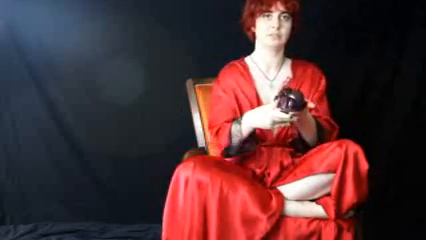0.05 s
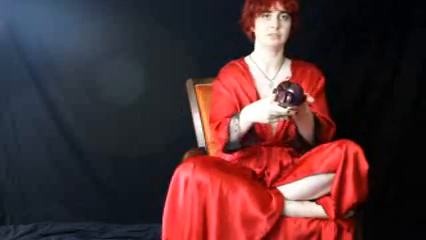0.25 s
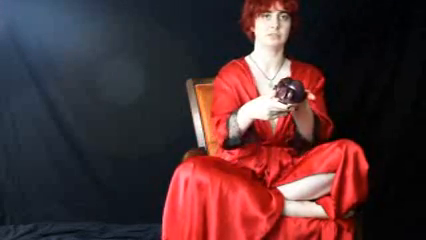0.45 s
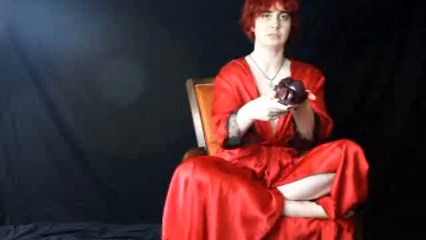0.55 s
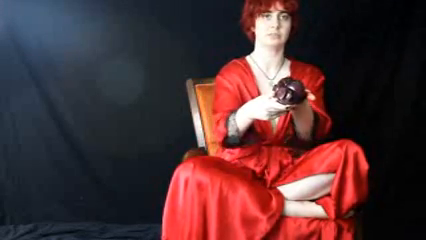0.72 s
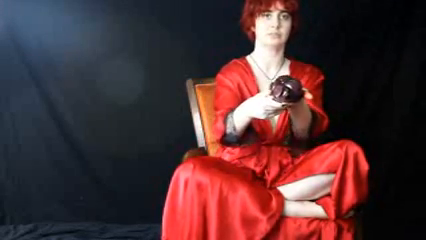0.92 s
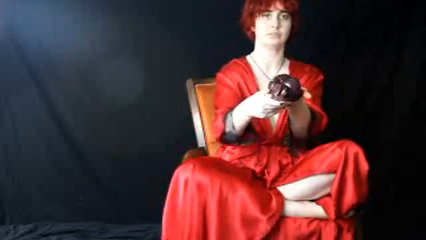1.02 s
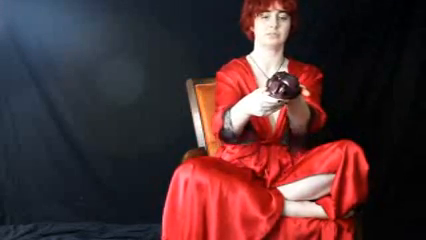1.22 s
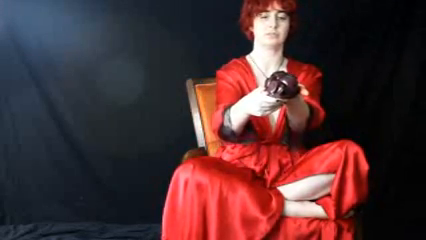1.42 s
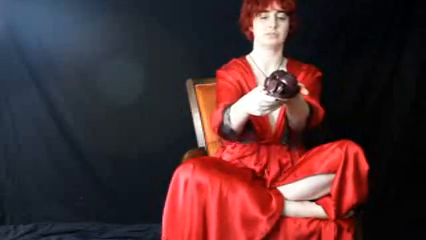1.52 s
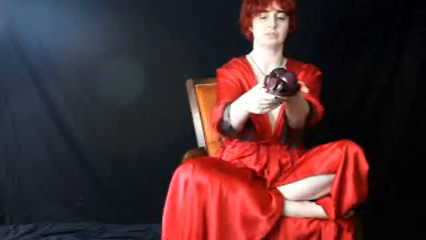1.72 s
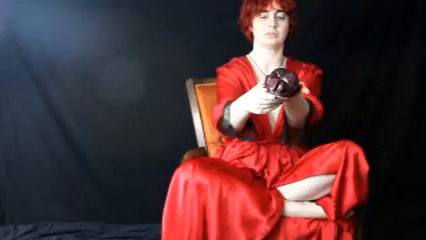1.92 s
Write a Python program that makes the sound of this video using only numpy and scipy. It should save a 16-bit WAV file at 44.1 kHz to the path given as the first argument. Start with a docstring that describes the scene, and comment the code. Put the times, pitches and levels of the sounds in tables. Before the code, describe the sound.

A camera shutter fires a burst of four shots in a quiet room, a little way from the microphone. A light button tap comes just before the shots, which start at about 0.2, 0.45, 0.7 and 0.95 seconds. Each is a crisp mechanical double-clack with a slight metallic ring, brief gear rattle and short room echo. From about 1.2 seconds only a faint hiss remains.

```python
"""In a quiet room, a little way from the microphone, a reflex camera fires a burst of four frames.
Each frame is the same chain of small blows: a lever trips, the mirror slaps up, two shutter curtains
snap across, the mirror drops and bounces, and the gears wind on. The blows make the camera's body
and springs ring, and the room answers. A faint hiss lies underneath."""
import sys
import numpy as np
from scipy import signal
from scipy.fft import rfft, irfft, next_fast_len
from scipy.io import wavfile

SR = 44100
rng = np.random.default_rng(int(sys.argv[2]) if len(sys.argv) > 2 else 0)


def bounce(signal):
    """Save signal as a 16-bit WAV file at the path given by the first command-line argument."""
    frames = np.transpose(np.atleast_2d(signal))
    limited = np.clip(frames, -1, 1)
    pcm = np.round(limited * 32767).astype(np.int16)
    wavfile.write(sys.argv[1], SR, pcm)


N = 85995
TIME = np.arange(N) / SR
BUTTON_S = 0.1556

# Each row is one frame: when the lever trips, the first curtain snaps and the mirror drops, in seconds.
FRAMES = [(0.2003, 0.2750, 0.3159), (0.4605, 0.5223, 0.5634), (0.7083, 0.7697, 0.8115),
          (0.9564, 1.0179, 1.0592)]


def mirror_fall():
    """The loudest clack: the mirror lands with a ping, bounces and leaves the springs singing."""
    # Each row is one landing: strength in dB, extra level of its ping in dB.
    landings = [(3, -1.5), (2.5, -7.5), (3, -1), (2, 1.5)]
    # Each row: time of a bounce in seconds, level in dB.
    bounces = [(0.3234, -4.5), (0.3303, -13), (0.5661, -7), (0.5709, -13), (0.5772, -10), (0.8196, -9.5),
               (0.8246, -15.5), (1.0673, -6.5), (1.073, -15)]
    # The tone of the clack. Each row: frequency in Hz, level in dB.
    colour = [(200, -18.5), (450, -4), (750, -2.5), (1900, -1), (2600, 3), (3700, 4), (4900, -5.5),
              (8000, -6), (10500, -21), (15000, -28)]
    # How mirror and springs ring. Each row: pitch in Hz, level in dB, seconds to fade by 60 dB.
    mirror_notes = [(2500, -25, 0.0076), (3320, -23.5, 0.006), (3460, -21, 0.01), (3890, -27, 0.013)]
    spring_notes = [(2760, -54, 0.27), (2923, -56, 0.27), (3397, -51.5, 0.21), (3483, -56, 0.17),
                    (4100, -55, 0.13)]
    drop_times = np.array(FRAMES)[:, 2]
    drop_db, ping_db = np.transpose(landings)
    bounce_times, bounce_db = np.transpose(bounces)
    out = contact(drop_times, drop_db, colour, mirror_notes,
                  settle_s=0.0005, snap_db=-18.5, fade_s=0.013, body_db=-19, ping_db=ping_db)
    out += contact(bounce_times, bounce_db, colour, mirror_notes,
                   settle_s=0.0005, snap_db=3, fade_s=0.013, body_db=-6, ping_db=-8)
    singing = ring(spring_notes, size=16000)
    for start, db in zip(drop_times, drop_db):
        add(out, start + 0.0005, from_db(db) * singing)
    return out


def mirror_rise():
    """The button taps once; in each frame a lever throws the mirror up past its damper to its stop."""
    # The tone of each click. Each row: frequency in Hz, level in dB.
    button_colour = [(450, -28), (900, -10), (1800, -11.5), (2800, -8), (4000, -17.5), (7500, -17.5),
                     (10500, -38), (15000, -43)]
    lever_colour = [(200, -20), (450, -16), (800, 4), (1300, 2), (2100, 1.5), (3600, -1.5), (5800, -3.5),
                    (8200, -8.5), (11000, -19), (15000, -23.5)]
    slap_colour = [(200, -48), (450, 0.5), (900, 4.5), (2600, -5.5), (3600, 3.5), (5000, -7), (8200, -20),
                   (15000, -30)]
    # How each part rings. Each row: pitch in Hz, level in dB, seconds to fade by 60 dB.
    button_notes = [(990, -40, 0.04), (1410, -43, 0.057)]
    lever_notes = [(1068, -35.5, 0.041), (1947, -33, 0.016), (2697, -34.5, 0.036)]
    stop_notes = [(3623, -30, 0.012)]
    trip_times = np.array(FRAMES)[:, 0]
    graze_after_s, slap_after_s = 0.0162, 0.0186
    tap = contact([BUTTON_S], 0, button_colour, button_notes,
                  settle_s=0.000399, snap_db=5, fade_s=0.012, body_db=-25.5)
    trip = contact(trip_times, 0, lever_colour, lever_notes,
                   settle_s=0.001, snap_db=-9.5, fade_s=0.02, body_db=-33)
    graze = contact(trip_times + graze_after_s, -4.5, lever_colour, lever_notes,
                    settle_s=0.0008, snap_db=3.5, fade_s=0.012, body_db=-4)
    slap = contact(trip_times + slap_after_s, 0, slap_colour, stop_notes,
                   settle_s=0.00011, snap_db=-2.5, fade_s=0.0092, body_db=-1.0)
    return tap + trip + graze + slap


def curtains():
    """The shutter opens and closes with two light snaps: the first crisp, the second fuller."""
    # The tone of each snap. Each row: frequency in Hz, level in dB.
    first_colour = [(200, -9.5), (450, -7.5), (850, 1), (1300, -1.5), (3500, -4.5), (5800, -4.5),
                    (8800, -3), (11000, -10.5), (15000, -19)]
    second_colour = [(200, 4), (450, -16.5), (850, 1.5), (1300, 2), (1900, 1.5), (3500, -2.5), (8500, -8.5),
                     (11000, -19), (15000, -28)]
    # How each curtain rings. Each row: pitch in Hz, level in dB, seconds to fade by 60 dB.
    first_notes = [(1750, -38, 0.017), (5700, -34, 0.012)]
    second_notes = [(930, -23, 0.013), (1830, -30, 0.0073), (2570, -34.5, 0.016)]
    open_times, exposure_s = np.array(FRAMES)[:, 1], 0.0162
    opening = contact(open_times, -0.64, first_colour, first_notes,
                      settle_s=0.00046, snap_db=-19, fade_s=0.014, body_db=-14.5)
    closing = contact(open_times + exposure_s, -0.55, second_colour, second_notes,
                      settle_s=0.0012, snap_db=-16.5, fade_s=0.017, body_db=-19)
    return opening + closing


def contact(times, levels_db, colour, notes, settle_s, snap_db, fade_s, body_db, ping_db=0):
    """A part hits its stop: it chatters, settles with one sharp snap, pings and knocks the body."""
    # How the camera's body rings. Each row: pitch in Hz, level in dB, seconds to fade by 60 dB.
    body_notes = [(435, -39.5, 0.033), (618, -41.5, 0.022), (830, -19, 0.039), (944, -32.5, 0.034),
                  (1450, -34, 0.064)]
    variation = 0.45   # how much one blow differs from the next
    usual = chatter(settle_s / 2, fade_s, size=1024)
    usual[int(settle_s * SR)] += from_db(snap_db)
    usual /= np.linalg.norm(usual)
    knock = from_db(body_db) * ring(body_notes, size=4096)
    ping = ring(notes, size=4096)
    out = np.zeros(N)
    for start, gain, ping_gain in zip(*np.broadcast_arrays(times, from_db(levels_db), from_db(ping_db))):
        fresh = chatter(settle_s / 2, fade_s, size=1024)
        crack = (usual + variation * fresh) / np.hypot(1, variation)
        add(out, start, gain * tint(crack, colour))
        add(out, start + settle_s, gain * (knock + ping_gain * ping))
    return out


def chatter(rise_s, fade_s, size):
    """A few milliseconds of dense rattling, about equally strong at all frequencies."""
    t = TIME[:size]
    burst = rng.standard_normal(size) * (1 - np.exp(-t / rise_s)) * from_db(-60 * t / fade_s)
    spectrum = rfft(burst, 2 * size)
    rattle = irfft(spectrum / np.abs(spectrum))[:size]
    return rattle / np.linalg.norm(rattle)


def ring(notes, size):
    """A struck part rings with fading pure tones; neighbouring tones swing opposite ways."""
    t = TIME[:size]
    return sum((-1) ** k * from_db(db - 60 * t / fade_s) * np.sin(2 * np.pi * hz * t)
               for k, (hz, db, fade_s) in enumerate(notes))


def gears():
    """The gears rattle briefly after each frame; the motor runs faintly all through the burst."""
    # The tone of the gears and of the motor. Each row: frequency in Hz, level in dB.
    gear_colour = [(200, -36), (450, -1.5), (900, 3.5), (1550, -2.5), (2100, -2.5), (3400, -0.5),
                   (5000, -7.5), (7800, -16), (10500, -19), (15000, -28)]
    motor_colour = [(200, -10), (400, 3), (560, -3.5), (900, -4), (2000, -13), (3500, -10.5), (7500, -23.5),
                    (10500, -34), (15000, -38)]
    wind_s, slow_down_s, wind_db, motor_db = 0.041, 0.011, -14, -24

    def running(start, end):
        return (TIME > start) * np.exp(-np.maximum(TIME - end, 0) / slow_down_s)

    load = sum(running(drop, drop + wind_s) for _, _, drop in FRAMES)
    winding = from_db(wind_db) * load * teeth(gear_colour)
    motor = from_db(motor_db) * running(BUTTON_S, FRAMES[-1][2]) * teeth(motor_colour)
    return winding + motor


def teeth(colour, teeth_per_s=700):
    """Gear teeth tick unevenly as they catch, one tick for each tooth."""
    travel = np.cumsum(teeth_per_s / SR * (1 + 2 * rng.standard_normal(N)))
    teeth_passed = np.floor(np.maximum.accumulate(travel))
    ticks = np.diff(teeth_passed, prepend=0) * from_db(rng.normal(0, 2.0, N))
    return tint(ticks * rng.choice([-1, 1], N), colour)


def room(sound, size=20000, onset_s=0.004):
    """Two echoes from the nearest surfaces and a short wash of sound whose treble dies first."""
    # Each row: frequency in Hz, seconds the wash takes to fade by 60 dB.
    fade_times = [(200, 0.45), (800, 0.21), (3000, 0.2), (8000, 0.2), (15000, 0.14)]
    # The tone of the wash. Each row: frequency in Hz, level in dB.
    colour = [(200, -0.5), (800, -8.5), (1500, -0.5), (3000, -2.5), (8000, 0.5), (15000, 0)]
    # Each row: delay in seconds, level in dB.
    echoes = [(0.0065, -11.5), (0.011, -20)]
    t, hz = TIME[:size], frequencies(size)
    centres, fades = np.transpose(fade_times)
    spectrum, wash = rfft(rng.standard_normal(size)), 0
    for share, fade_s in zip(np.eye(len(centres)), fades):
        noise_band = irfft(spectrum * np.interp(np.log(hz), np.log(centres), share))
        fade = (1 - np.exp(-(t / onset_s) ** 2)) * from_db(-60 * t / fade_s)
        wash = wash + noise_band * fade / np.linalg.norm(fade)
    response = tint(wash, colour)
    for delay_s, db in echoes:
        response[int(delay_s * SR)] += from_db(db)
    return signal.fftconvolve(sound, response)[:N]


def background(hiss_db=-58.5):
    """Steady hiss with a few faint swells of rumble and rustle."""
    # The tone of the hiss. Each row: frequency in Hz, level in dB.
    colour = [(22, -30), (55, -4.5), (130, -4.5), (220, -4), (440, -4.5), (700, -6.5), (1400, -9),
              (2840, -12), (7900, -18.5), (11000, -24.5), (16000, -24.5)]
    # Each row: time of the peak in seconds, half length in seconds, centre in Hz, level in dB.
    swells = [(0.01, 0.021, 410, -57), (0.382, 0.055, 68, -64), (1.002, 0.037, 62, -63.5),
              (1.627, 0.056, 68, -66.5), (1.675, 0.02, 2800, -63), (1.662, 0.015, 7000, -63.5),
              (1.85, 0.025, 654, -65.5)]
    hiss = irfft(rfft(rng.standard_normal(N)) * colour_gains(colour, N), N)
    out = from_db(hiss_db) * hiss / hiss.std()
    for peak_s, half_s, hz, db in swells:
        octave = signal.butter(2, [hz / np.sqrt(2), hz * np.sqrt(2)], "band", fs=SR, output="sos")
        noise = signal.sosfilt(octave, rng.standard_normal(N))
        swell = np.exp(-.5 * ((TIME - peak_s) / half_s) ** 2)
        out += from_db(db) * noise / noise.std() * swell
    return out


def from_db(db):
    """Turn decibels into a number to multiply by."""
    return 10 ** (np.asarray(db) / 20)


def frequencies(size):
    """The frequencies in the spectrum of `size` samples, never below 1 Hz."""
    return np.maximum(np.fft.rfftfreq(size, 1 / SR), 1)


def colour_gains(colour, size):
    """Fill in between the rows of a tone table to get a gain for every frequency."""
    hz, db = np.transpose(colour)
    return from_db(np.interp(np.log(frequencies(size)), np.log(hz), db))


def tint(sound, colour):
    """Give a sound a tone colour without smearing it earlier in time (a minimum-phase filter)."""
    size = 2 * next_fast_len(len(sound))
    cepstrum = irfft(np.log(colour_gains(colour, size)))[:len(sound)]
    cepstrum[1:] *= 2
    return irfft(rfft(sound, size) * np.exp(rfft(cepstrum, size)))[:len(sound)]


def add(out, start_s, sound):
    """Mix a sound in at a given time."""
    part = out[int(start_s * SR):][:len(sound)]
    part += sound[:len(part)]


def scene():
    """Each part of the camera sounds into the room in its own way, over the hiss."""
    # Level of the room's answer in dB for: mirror rise, curtains, mirror fall, gears.
    room_db = [-1.1, 0.56, 0.34, -0.59]
    parts = mirror_rise(), curtains(), mirror_fall(), gears()
    camera = sum(part + from_db(db) * room(part) for part, db in zip(parts, room_db))
    bass_cut = signal.butter(3, 277, "high", fs=SR, output="sos")   # a small body gives off little bass
    return (signal.sosfilt(bass_cut, camera) + background())[None]


def record(dry):
    """The highest treble, above 16000 Hz, is cut steeply."""
    return signal.sosfilt(signal.ellip(10, .1, 70, 16000, fs=SR, output="sos"), dry)


dry = scene()
out = record(dry)
bounce(out)
```